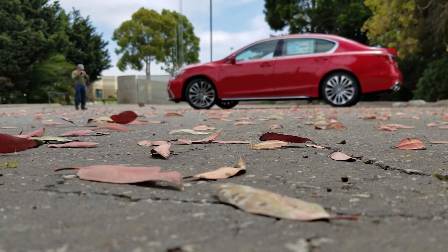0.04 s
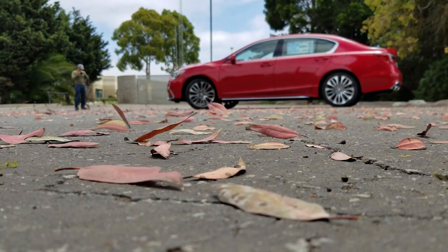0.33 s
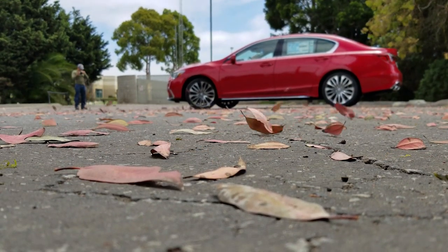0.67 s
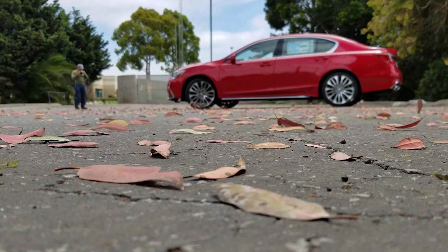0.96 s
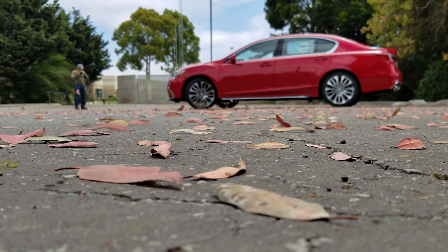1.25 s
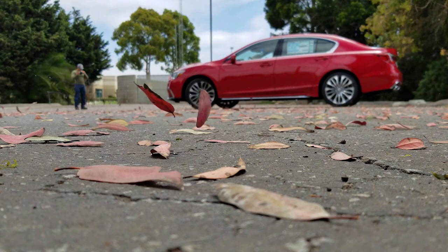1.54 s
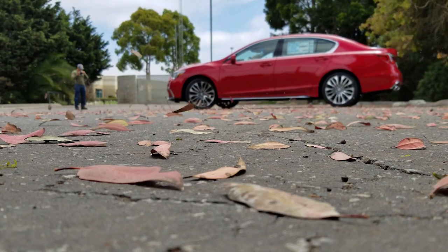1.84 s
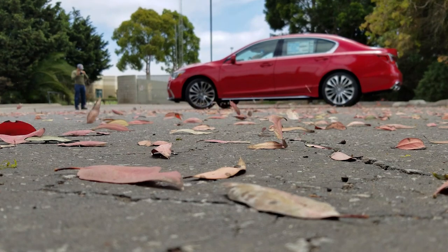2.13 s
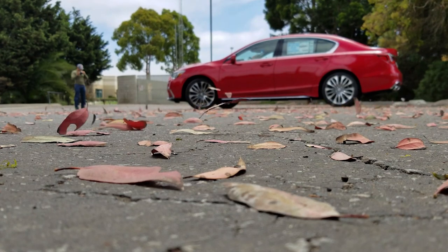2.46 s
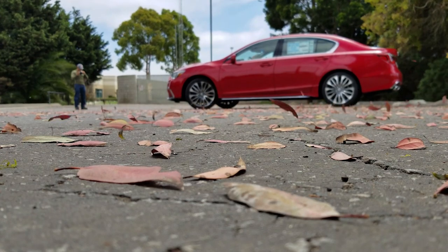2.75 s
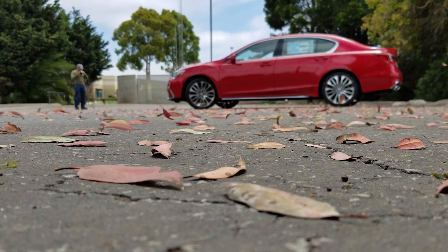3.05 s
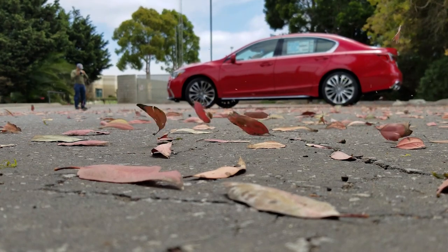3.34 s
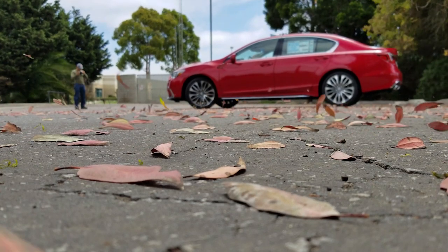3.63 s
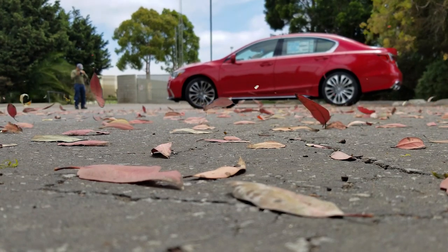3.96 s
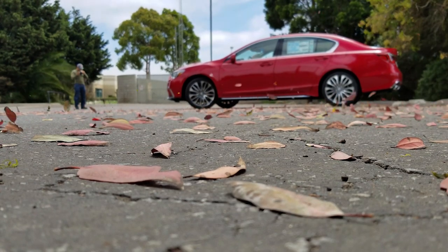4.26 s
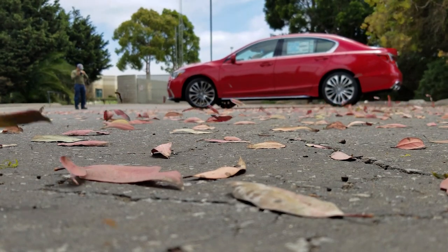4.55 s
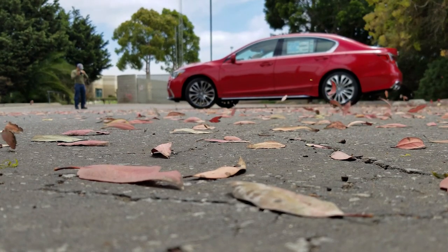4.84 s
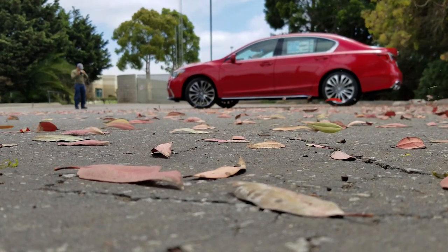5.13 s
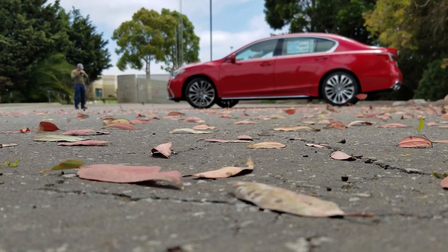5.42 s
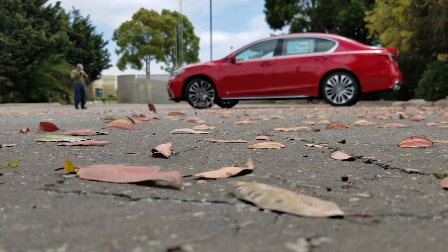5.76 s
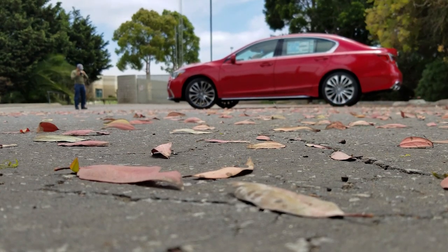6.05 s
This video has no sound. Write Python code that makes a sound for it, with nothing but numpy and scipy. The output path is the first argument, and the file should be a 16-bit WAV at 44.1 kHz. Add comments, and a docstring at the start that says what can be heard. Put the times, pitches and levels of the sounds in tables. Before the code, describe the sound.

Wind buffets a microphone on the ground in a car park, making an uneven low rumble with flutters and short thumps. Throughout, dry leaves skitter over asphalt, with small ticks and scrapes nearby and a fine crackle further off, above a soft wash of trees and distant traffic. Gusts come and go from the start, and a flurry of leaves passes on the left around 1.5 seconds. The wind builds again after 2 seconds and hits hardest just after 3. Sharp leaf ticks follow from about 3.3 seconds, one with a dull knock on the left. At 4 seconds comes the sharpest scrape, with a quick cluster of dull knocks on the microphone. Another gust rumbles from about 4.6 to 5.2 seconds. The leaves swell around 5.5 seconds, with crisp ticks close on the right, as the wind drops toward the end at 6 seconds.

```python
"""Car park: gusts push dry leaves over asphalt, past a phone standing on the ground.
Trees and far traffic make a soft wash. Eddies buffet the two microphone ports: rumble, flutter, thumps.
Leaf edges catch on grit in bursts of tiny slips that ring the blade: ticks and scrapes nearby,
a fine crackle far off. A few dull knocks sound on the phone; some nearby ticks have a low body."""
import sys
import numpy as np
from scipy import signal
from scipy.fft import rfft, irfft, next_fast_len
from scipy.io import wavfile

SR = 44100
rng = np.random.default_rng(int(sys.argv[2]) if len(sys.argv) > 2 else 0)


def transcribe(u):
    """Save the signal u as a 16-bit wav file named by the first command-line argument.

    u: samples, shape (n,) or (channels, n), limited to [-1, 1]; the rate is SR.
    q: integer samples, one column per channel.
    """
    v = np.clip(np.atleast_2d(u).T, -1, 1)
    q = np.round(v * 32767).astype(np.int16)
    wavfile.write(sys.argv[1], SR, q)


N = 268569
TIME_S = np.arange(N) / SR
GRAIN = 1024  # samples per contact

# Table levels are relative.
# trees and far traffic (time [s], level [dB])
WASH_LEVEL = [(0.0, -42), (0.64, -48), (1.8, -47.5), (2.8, -45.5), (3.5, -49), (4.6, -49), (5.39, -44.5),
              (6.09, -43.5)]
# wash, part unrelated between ports (frequency [Hz], density [dB])
WASH_APART_SPECTRUM = [(100, 18), (400, -3.5), (650, 5.5), (950, 9.5), (1300, 4.5), (2000, -4), (4000, -18)]
# wash, part common to both ports (frequency [Hz], density [dB])
WASH_COMMON_SPECTRUM = [(100, -5.5), (400, -4.5), (650, -5.0), (1000, -8.0)]
# crowd of sliding leaves (time [s], level [dB])
DRIFT_LEVEL = [(0.0, -44.5), (0.83, -45), (1.27, -41.5), (1.6, -37), (1.87, -40.5), (2.5, -42),
               (2.88, -40.5), (3.19, -39), (4.04, -39), (4.34, -41), (4.76, -44), (5.5, -36), (6.09, -43)]
# far rustle as coloured by the phone's microphone (frequency [Hz], density [dB])
RUSTLE_MIC_SPECTRUM = [(1200, -0.5), (1750, 1), (2400, 4.5), (2900, 1.5), (3700, 5), (5600, 3.5), (7000, 0),
                       (7800, -1.5), (9100, -7), (10800, -3), (12800, 2.5), (15800, 0)]
# gusts at the ports (start [s], length [s], level [dB])
PORT_GUSTS = [(0.22, 0.51, -30.5), (0.704, 0.16, -26.5), (0.918, 0.57, -30.5), (1.31, 0.25, -30),
              (2.16, 0.22, -30), (2.398, 0.58, -29), (3.016, 0.3, -21.5), (3.115, 0.05, -18.5),
              (3.22, 0.059, -30), (3.324, 0.38, -31.5), (3.95, 0.13, -28.5), (4.242, 0.19, -37),
              (4.599, 0.59, -26.5), (4.796, 0.04, -25), (5.42, 0.08, -31.5), (5.61, 0.029, -28),
              (5.776, 0.014, -26.5)]
# turbulence (frequency [Hz], density [dB])
WIND_SPECTRUM = [(25, -15), (45, -1.5), (72, 1), (125, 2.5), (190, -2.5), (330, -2.5), (450, -8.5),
                 (630, -19.5), (850, -27.5)]
# single strong eddies (time [s], level [dB], centre [Hz], half passing time [ms])
STRONG_EDDIES = [(0.239, -28, 111, 9.7), (0.295, -24, 109, 19), (0.5, -20, 240, 9.7),
                 (0.589, -27, 224, 8.4), (0.778, -18.5, 140, 22), (1.197, -15.5, 124, 8.1),
                 (1.441, -22, 139, 11), (1.52, -18.5, 205, 11), (1.681, -24.5, 131, 4.2),
                 (2.17, -20, 111.5, 13), (2.232, -23.5, 148, 10), (2.68, -21.5, 285, 12),
                 (2.774, -21.5, 270, 13), (3.029, -15.5, 90, 18), (3.122, -10.5, 85, 12),
                 (3.172, -7.5, 170, 9.3), (3.228, -22.5, 322, 8.3), (3.251, -29, 75, 18),
                 (4.855, -14, 315, 12), (5.006, -21, 141, 10), (5.638, -22, 160, 7.4),
                 (5.785, -20.5, 187, 11)]
# leaf scrapes as coloured by the phone's microphone (frequency [Hz], density [dB])
SCRAPE_MIC_SPECTRUM = [(300, 1.5), (900, 2.5), (2200, 3), (4200, 2.5), (6000, 1.5), (7000, 0), (7800, 0.5),
                       (9200, -10.5), (11000, -7), (12800, -4), (15800, -6.5)]
# near leaves touching down (time [s], level [dB], length [ms], ring [Hz], top octave [dB],
# side [-1 left, +1 right; beyond: close by that port])
NEAR_CONTACTS = [(0.312, -35.5, 3, 1660, -3, 0), (0.5177, -33.5, 1.7, 5500, -9, .5),
                 (0.85, -35, 13, 4020, -20, -1), (0.9256, -32, 0.7, 3570, -6, -0.87),
                 (1.0323, -34, 2, 6500, 0, 0.46), (1.245, -31, 1.5, 5500, 3, -1.2),
                 (1.2532, -34.5, 1.5, 4230, -13, -0.86), (1.33, -39, .5, 2000, 10, -0.66),
                 (1.4095, -33, .6, 6150, -5, -1.2), (1.4172, -24, 3.2, 5200, -10, -0.74),
                 (1.443, -28, 7.6, 5440, -4, -0.78), (1.45, -29, 6.2, 3970, -9, -0.76),
                 (1.4612, -27, 7.6, 5700, -1, -1), (1.5355, -28, 3, 5570, -12, -0.91),
                 (1.5678, -28.5, 2.3, 3980, -24, -0.85), (1.6209, -33, 1.8, 5320, -10, -1),
                 (1.6311, -30.5, 1.4, 5370, -6, -.2), (1.703, -34, 5, 5500, 4, -1.1),
                 (1.711, -31, 4.5, 3580, 0, -1), (1.7553, -32, 0.79, 6300, -3, -0.59),
                 (1.7734, -31.5, 9.2, 3600, 3, -.8), (1.8483, -39, 2, 4450, -15, -0.71),
                 (2.001, -32, 1.2, 7200, -2.5, -0.012), (2.011, -32.5, 4.2, 1910, 0, -0.25),
                 (2.222, -34, 5.7, 2900, -8, -.5), (2.2316, -32, 0.78, 6300, 3, -0.31),
                 (2.4691, -30.5, 3.4, 2540, -15, -0.77), (2.893, -30, 0.89, 4070, -7, -1),
                 (2.921, -30, 0.44, 3200, -11, -0.76), (2.9808, -31, 3.1, 5230, -14, -0.8),
                 (3.061, -31.5, 1.2, 7000, -2, -1.1), (3.0972, -28.5, 1.7, 4260, -1, -0.84),
                 (3.147, -31, 0.28, 3810, -4, -0.79), (3.2515, -26, 4.2, 3400, -3, -.8),
                 (3.2627, -27.5, 4.1, 5200, -5, -.7), (3.2747, -30, 7.1, 4000, 4, -.7),
                 (3.2857, -30, 7.6, 5400, -1, -0.86), (3.3029, -26.5, 0.76, 5000, -9, 0),
                 (3.3351, -23.5, 5.9, 2850, -5, .4), (3.389, -33, .8, 3600, 14, -0.32),
                 (3.4287, -31, 1.3, 7400, -2.5, -1.1), (3.4335, -21, 0.46, 4500, -10, -1.58),
                 (3.4396, -29, 3.3, 3120, -12, -1.65), (3.459, -42, 1.5, 3880, -10, 1.8),
                 (3.467, -37, .6, 5880, -6, 1.6), (3.4926, -25.5, 1.3, 5200, -0.5, -0.66),
                 (3.5965, -20.5, 0.93, 2900, 15, .3), (3.654, -28.5, 0.92, 2100, -15, -0.35),
                 (3.7584, -28.5, 1, 3580, -8, 0.66), (3.852, -22.5, 1.4, 2470, -11, -1.37),
                 (3.888, -36.5, 2, 2500, -8, 0), (3.9574, -28, 1.7, 3100, 6, -0.33),
                 (3.9674, -25, 0.44, 2800, -3, 0), (3.9805, -12.5, 3.9, 3760, -5, 0.31),
                 (4.0137, -22, 1.7, 2160, -11, 0.72), (4.023, -24.5, 16, 5270, -5, 0.57),
                 (4.0564, -25, 3.8, 4300, -11, 1.15), (4.08, -24.5, 1.6, 2560, -11, 0.51),
                 (4.1318, -28, 3.3, 7600, -2, 1.1), (4.135, -28.5, 2.4, 2310, -9, .8),
                 (4.249, -33.5, 0.4, 4460, -5, .5), (4.3094, -33, 5.5, 7800, 6, 0.78),
                 (4.4054, -33, 0.91, 4400, -10, 0.86), (4.412, -30.5, 2, 4300, -7, 0.98),
                 (4.5249, -30.5, 0.3, 3680, -2, 0), (4.5343, -31, 2.5, 3920, -6, .3),
                 (4.7394, -29, 0.54, 2570, -6, 0.42), (4.888, -31, 0.29, 4360, 1, .6),
                 (4.9003, -29.5, 0.35, 2600, -5, -.3), (5.041, -23.5, 0.69, 3300, -8, -.3),
                 (5.0998, -25.5, 0.15, 5200, -6, 0.81), (5.115, -25, 0.3, 4240, -8, 0.64),
                 (5.3269, -30, 0.75, 3600, -6, 0), (5.3725, -30, .5, 3570, -19, -.2),
                 (5.421, -27, 2.1, 3470, -14, .2), (5.4533, -32, 2.7, 6200, -4, 0.67),
                 (5.6321, -28, 1.3, 7900, 0, 0.9), (5.6794, -20, 1.5, 2180, -7.5, 1.25),
                 (5.7218, -32.5, 2.5, 2370, -6, 1.3), (5.7303, -20, 0.85, 6400, 7, 1.5),
                 (5.7905, -32, 2.6, 2100, -14, 0.86), (5.8036, -20, 0.47, 4650, -16, 0.96),
                 (5.8312, -32, 1.1, 4500, -21, 0.93), (5.8764, -36, 0.4, 1960, -18, 0.9),
                 (5.9288, -32.5, 0.53, 5440, -4, 1.3)]
# dull knocks on the phone, and the low body of some nearby leaf ticks (time [s], level [dB],
# favoured frequency [Hz], damping [factor], left port lag [ms], left minus right [dB])
KNOCKS_AND_TICK_BODIES = [(2.0015, -31, 1100, 2.2, 0.0034, 0), (3.4337, -18, 420, 5.5, -0.25, 12),
                          (3.6557, -32, 1000, 2.8, -0.26, 1), (3.854, -27, 890, 1.5, -.5, 3),
                          (3.981, -35, 840, 1.5, 0.12, 8), (4.0145, -10, 495, 1.2, 0.36, 2),
                          (4.0169, -11.5, 850, 0.8, .6, -2), (4.0565, -35, 800, 1, 0.7, 6),
                          (4.0817, -19.5, 1010, 1, 0.15, 2)]
# resonances of a knock or tick body (frequency [Hz], width before damping factor [Hz], level [dB])
DULL_MODES = [(330, 150, -11), (480, 120, 0), (640, 150, -5), (970, 140, -4), (1220, 140, -6),
              (2320, 200, -6), (2810, 160, -10)]

GUST_ATTACK_S, GUST_RELEASE_S = 0.024, 0.073
BREEZE_DB, LULL_START_S, LULL_DB_PER_S = -34, 5.58, 24
LEAD_MS, CATCH_MS = 6, 0.12  # grain start to catch; rise of the catch
DRAG_DB, DRAG_RISE_MS, DRAG_DECAY_MS = -21, 1.2, 4.5
PORT_LAG_MS, PORT_SHADE_DB = 0.527, 3.5  # far port, leaf fully to one side


def undb(db):
    """Decibels to gain."""
    return 10 ** (np.asarray(db) / 20)


def unit(x):
    """Scale to rms 1."""
    return x / np.sqrt(np.mean(x ** 2))


def curve(rows, times_s=TIME_S):
    """Interpolate (time [s], value) rows."""
    return np.interp(times_s, *np.transpose(rows))


def colour(points, hz, skirt_db_per_octave=18):
    """Gain of a spectrum at hz, falling off past its ends."""
    points_hz, db = np.transpose(points)
    octave, knots = np.log2(np.maximum(hz, 1)), np.log2(points_hz)
    outside = abs(octave - np.clip(octave, knots[0], knots[-1]))
    return undb(np.interp(octave, knots, db) - skirt_db_per_octave * outside)


def shaped(x, points):
    """Filter by a spectrum; rms 1."""
    size = next_fast_len(N)
    gain = colour(points, np.fft.rfftfreq(size, 1 / SR))
    return unit(irfft(rfft(x, size) * gain, size)[..., :N])


def walk(rate_hz):
    """Smooth random wander; rms 1."""
    knots = rng.standard_normal(4096)
    return unit(np.interp(TIME_S * rate_hz, np.arange(len(knots)), knots))


def place(spectra, times_s, db, lag_ms, pan_db):
    """Mix grains, levelled over 5 ms, into both ports with a delay and a level difference."""
    hz = np.fft.rfftfreq(GRAIN, 1 / SR)
    out = np.zeros((2, N + GRAIN))
    where = np.clip(((times_s - .001) * SR).astype(int), 0, N - 1)[:, None] + np.arange(GRAIN)
    for port, side in enumerate((1, -1)):
        delay_s = (1 + side * lag_ms / 2) / 1000
        waves = irfft(spectra * np.exp(-2j * np.pi * hz * delay_s[:, None]))
        power = np.sum(waves ** 2, axis=1) / (.005 * SR)
        waves *= (undb(db + side * pan_db / 2) / np.sqrt(power))[:, None]
        out[port] = np.bincount(where.ravel(), waves.ravel(), N + GRAIN)
    return out[:, :N]


def wash():
    """Trees and far traffic from all round: partly shared by the ports, unrelated in the treble."""
    common = shaped(rng.standard_normal(N), WASH_COMMON_SPECTRUM)
    apart = shaped(rng.standard_normal((2, N)), WASH_APART_SPECTRUM)
    return (undb(2.5) * common + undb(4.5) * apart) * undb(curve(WASH_LEVEL) + 1.8 * walk(5.1))


def far_rustle():
    """Far leaves merge into a fine, restless crackle, coloured by the microphone."""
    grains = rng.standard_normal((2, N)) * undb(4.8 * rng.standard_normal((2, N)))
    flicker_db = 1.4 * np.tanh(walk(25)) + 1.1 * walk(60) + 2.1 * walk(250)
    return shaped(grains * undb(flicker_db), RUSTLE_MIC_SPECTRUM) * undb(curve(DRIFT_LEVEL) + 0.35)


def wind_level_db():
    """Gusts build, hold and decay over a breeze that drops at the end."""
    power = undb(BREEZE_DB - LULL_DB_PER_S * np.maximum(TIME_S - LULL_START_S, 0)) ** 2
    for start_s, length_s, db in PORT_GUSTS:
        attack = np.clip(1 + (TIME_S - start_s) / GUST_ATTACK_S, 0, 1)
        release = np.exp(-np.maximum(TIME_S - start_s - length_s, 0) / GUST_RELEASE_S)
        power += (undb(db) * attack * release) ** 2
    return 10 * np.log10(power)


def wind_buffet():
    """Turbulence hits each port mostly on its own; small eddies flutter more as the wind rises."""
    level_db = wind_level_db()
    flutter_db = 1 + 0.52 * (level_db + 22)
    centres_hz = 28 * 2 ** np.arange(0, 5.1, .5)
    weights = colour(WIND_SPECTRUM, centres_hz) * np.sqrt(centres_hz)
    swirl_db = 8 * np.tanh(0.18 * walk(25) + .5 * np.array([walk(130), walk(130)]))
    out = np.zeros((2, N))
    for hz, weight in zip(centres_hz, weights / np.linalg.norm(weights)):
        noise = rng.standard_normal((3, N))  # left, right, common
        band = signal.butter(4, [hz / 2 ** .28, hz * 2 ** .28], "band", fs=SR, output="sos")
        pressure = unit(signal.sosfilt(band, noise[:2] + 0.32 * noise[2]))
        gust_db = level_db + flutter_db * np.clip(0.53 * np.log2(hz / 170), -.4, 1.2)
        # the smallest eddies need a hard gust
        gust_db += .22 * (level_db + 25) * np.clip(np.log2(hz / 330), 0, 1)
        # small eddies burst, large ones roll evenly
        bursts = unit(pressure * undb(swirl_db * min(hz / 130, 1.1)))
        out += weight * bursts * undb(gust_db)
    return undb(0.37) * out


def eddy_thumps(width_octaves=1.0, level_window_s=0.016):
    """A strong eddy rolls over both ports and shakes them, partly alike, for a few cycles."""
    times_s, db, centre_hz, half_ms = np.transpose(STRONG_EDDIES)
    offsets = np.arange(-2 * GRAIN, 2 * GRAIN)
    hz = np.maximum(np.fft.rfftfreq(len(offsets), 1 / SR), 1)
    bands = np.exp(-(np.log2(hz / centre_hz[:, None]) / width_octaves) ** 2)
    swirl = rng.standard_normal((3, len(times_s), len(offsets)))
    envelope = np.exp(-(1000 * offsets / SR / half_ms[:, None]) ** 2)
    waves = irfft(bands * rfft(swirl[:2] + 0.77 * swirl[2])) * envelope
    power = np.sum(waves ** 2, axis=-1, keepdims=True) / (level_window_s * SR)
    waves *= undb(db - 3.5)[:, None] / np.sqrt(power)
    where = np.clip((times_s[:, None] * SR).astype(int) + offsets, 0, N - 1)
    return np.array([np.bincount(where.ravel(), port.ravel(), N) for port in waves])


def scrapes(rows, ring_db, ring_width_ratio, grit_db):
    """A leaf edge catches on grit; a burst of tiny slips rings the stiff, well damped blade."""
    times_s, db, length_ms, ring_hz, top_db, lag_ms, pan_db = np.transpose(rows)
    ms = np.arange(GRAIN) / SR * 1000 - LEAD_MS
    hz = np.fft.rfftfreq(GRAIN, 1 / SR)
    noise = rng.standard_normal((len(times_s), 2, GRAIN))
    slips = noise[:, 0] * undb(grit_db * noise[:, 1])
    before_ms, after_ms = np.maximum(-ms, 0), np.maximum(ms, 0)
    catch = np.exp(-before_ms / CATCH_MS - (after_ms / np.maximum(length_ms, .2)[:, None]) ** 2)
    drag = undb(DRAG_DB) * np.exp(-before_ms / DRAG_RISE_MS - after_ms / DRAG_DECAY_MS)
    ratio = np.maximum(hz, 1) / ring_hz[:, None]
    blade = 1 + undb(ring_db) / (1 + 1j * (ratio - 1 / ratio) / ring_width_ratio)
    spectra = rfft(slips * (catch + drag)) * blade * colour(SCRAPE_MIC_SPECTRUM, hz)
    # sharp tips give more top octave than flat sides
    top_band = 1 / (1 + np.exp((9000 - hz) / 400))
    power = abs(spectra) ** 2
    top_gain = undb(top_db) * np.sqrt((power @ (1 - top_band)) / (power @ top_band))
    spectra *= 1 - top_band + top_band * top_gain[:, None]
    return place(spectra, times_s - LEAD_MS / 1000, db, lag_ms, pan_db)


def skittering_leaves(leaves=460, hops=3, mean_gap_s=0.022):
    """Leaves further off tumble on every side; each touches down a few times with its own ring."""
    per_leaf = rng.standard_normal((leaves, 3, 1))
    per_hop = rng.standard_normal((leaves, 3, hops))
    starts_s = rng.uniform(0, N / SR, (leaves, 1))
    gaps_s = rng.exponential(mean_gap_s, (leaves, hops))
    times_s = (starts_s + np.cumsum(gaps_s, axis=1)) % (N / SR)
    accent_db = 13 * np.tanh(.5 * rng.exponential(size=(leaves, hops)))  # a few stand out
    db = curve(DRIFT_LEVEL, times_s) - 6 + accent_db
    length_ms = 0.98 * np.exp(1.64 * per_hop[:, 0])
    ring_hz = np.clip(4200 * np.exp(0.46 * per_leaf[:, 0] + 0.15 * per_hop[:, 1]), 1400, 8500)
    top_db = -4 + 3 * per_leaf[:, 1] + 3 * per_hop[:, 2]
    side = np.sin(np.pi * per_leaf[:, 2]) * np.ones(hops)
    rows = np.stack([times_s, db, length_ms, ring_hz, top_db, PORT_LAG_MS * side, -2.5 * side], axis=-1)
    return scrapes(np.concatenate(rows), ring_db=9.5, ring_width_ratio=.2, grit_db=8)


def near_leaves():
    """Leaves hop and scrape by the phone: mostly left at first, later right."""
    contacts = np.array(NEAR_CONTACTS)
    side = np.clip(contacts[:, 5], -2, 2)
    lag_ms = PORT_LAG_MS * np.clip(side, -1, 1)
    pan_db = -PORT_SHADE_DB * side ** 3
    rows = np.column_stack([contacts[:, :5], lag_ms, pan_db])
    return undb(3.5) * scrapes(rows, ring_db=10.5, ring_width_ratio=0.22, grit_db=8.5)


def knocks_and_tick_bodies(low_cut_hz=232):
    """Dull knocks on the phone and the low body of some near ticks: damped modes ring for a few ms."""
    times_s, db, favoured_hz, damping, lag_ms, pan_db = np.transpose(KNOCKS_AND_TICK_BODIES)
    age_s = np.arange(GRAIN) / SR
    rings = 0
    for hz, width_hz, mode_db in DULL_MODES:
        share = undb(mode_db - 10 * abs(np.log2(hz / favoured_hz)))
        decay = np.exp(-np.pi * width_hz * damping[:, None] * age_s)
        rings = rings + share[:, None] * decay * np.sin(2 * np.pi * hz * age_s)
    low_cut = signal.butter(2, low_cut_hz, "high", fs=SR, output="sos")  # the knocks carry no deep thud
    return place(rfft(signal.sosfilt(low_cut, rings)), times_s, db, lag_ms, pan_db)


def scene():
    """Wind, leaves and wash at the two ports."""
    wind = wind_buffet() + eddy_thumps()
    leaves = near_leaves() + skittering_leaves() + far_rustle() + knocks_and_tick_bodies()
    return wind + leaves + wash()


def record(dry):
    """The phone clips the sharpest ticks and cuts the top."""
    clip_level, top_hz = 0.88, 15900
    high_cut = signal.ellip(10, .2, 80, top_hz, fs=SR, output="sos")
    return signal.sosfilt(high_cut, np.clip(dry, -clip_level, clip_level))


dry = scene()
out = record(dry)
transcribe(out)
```